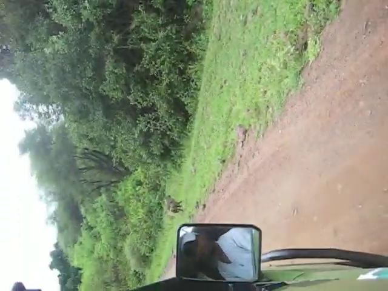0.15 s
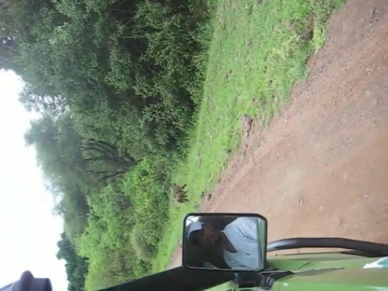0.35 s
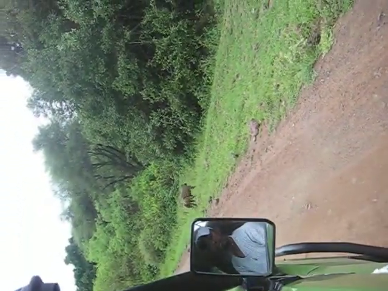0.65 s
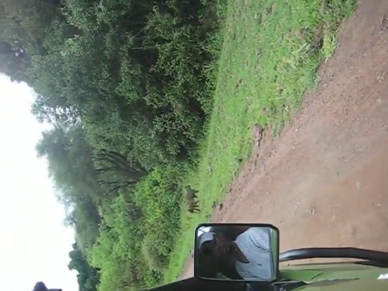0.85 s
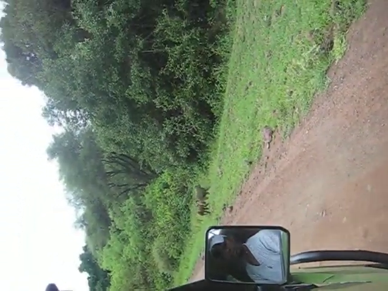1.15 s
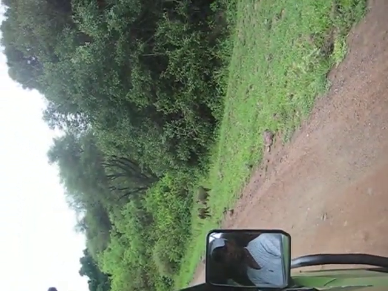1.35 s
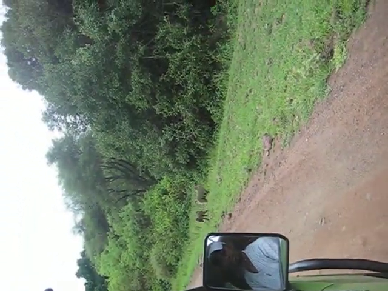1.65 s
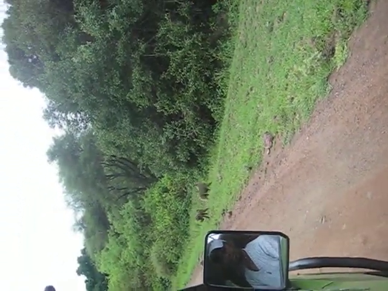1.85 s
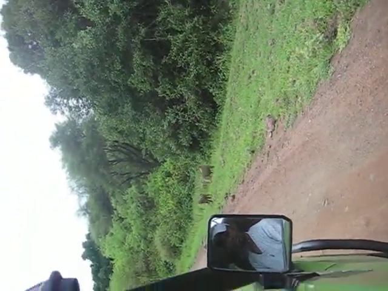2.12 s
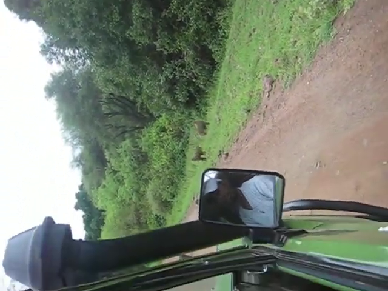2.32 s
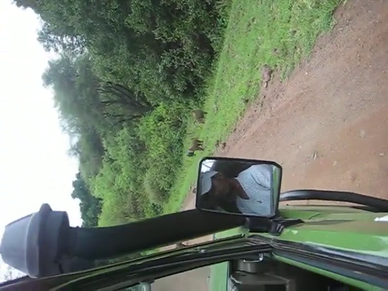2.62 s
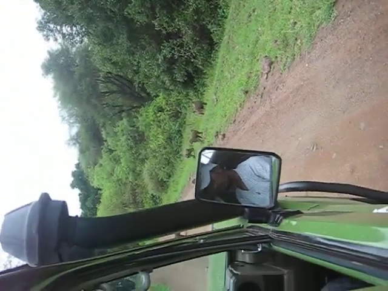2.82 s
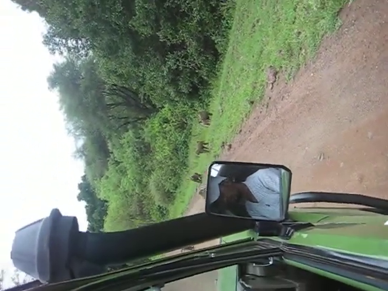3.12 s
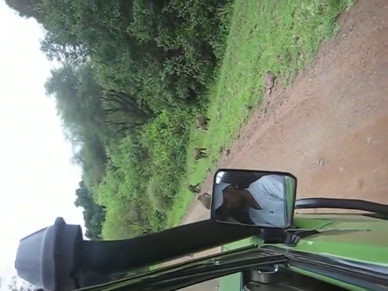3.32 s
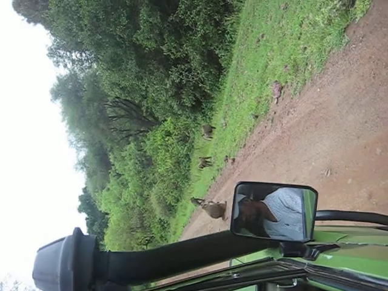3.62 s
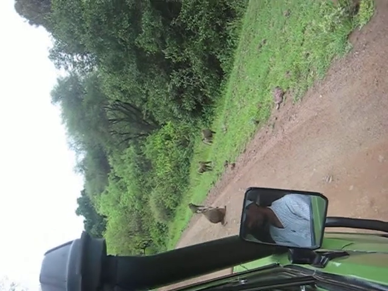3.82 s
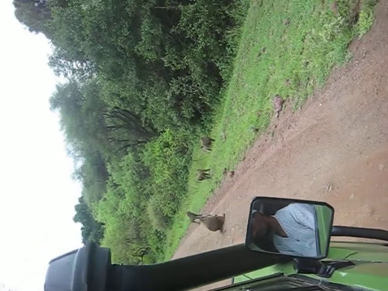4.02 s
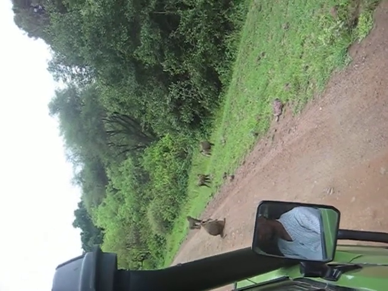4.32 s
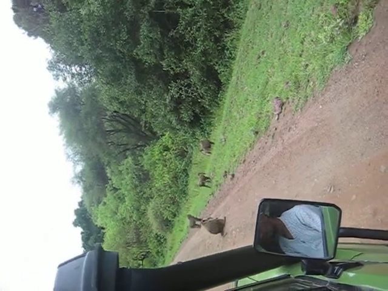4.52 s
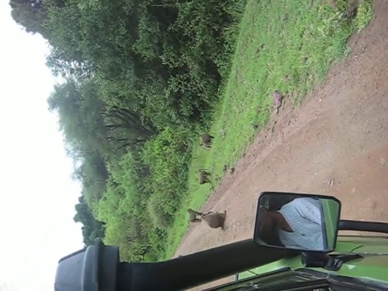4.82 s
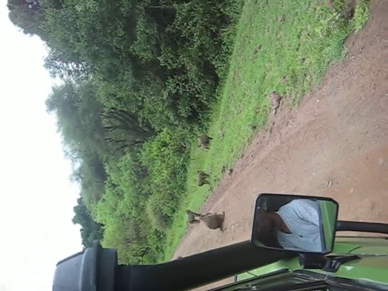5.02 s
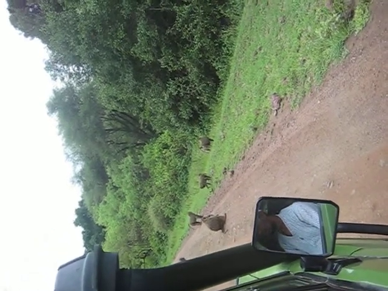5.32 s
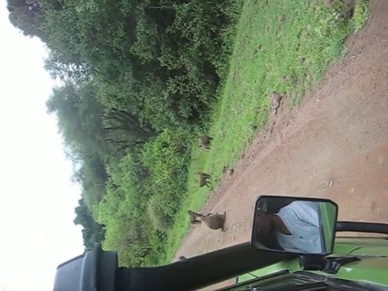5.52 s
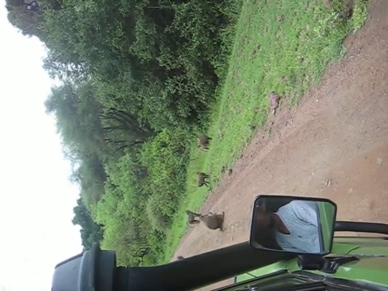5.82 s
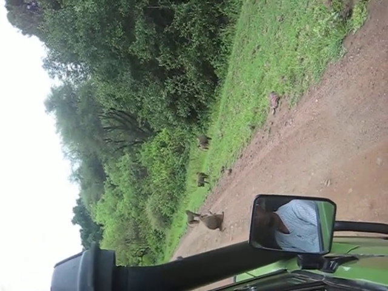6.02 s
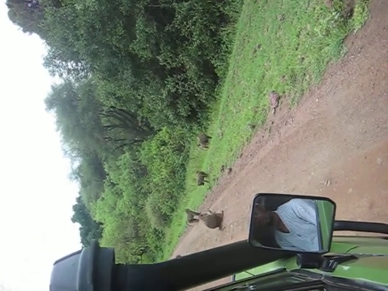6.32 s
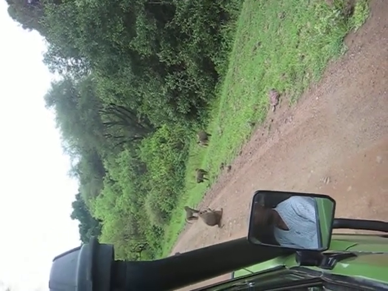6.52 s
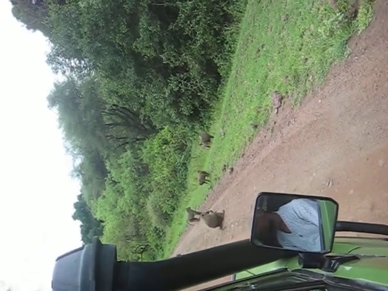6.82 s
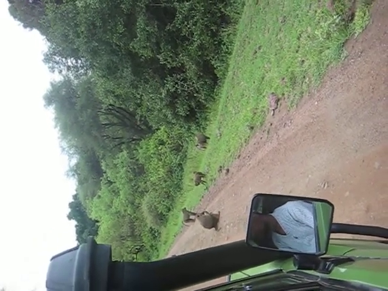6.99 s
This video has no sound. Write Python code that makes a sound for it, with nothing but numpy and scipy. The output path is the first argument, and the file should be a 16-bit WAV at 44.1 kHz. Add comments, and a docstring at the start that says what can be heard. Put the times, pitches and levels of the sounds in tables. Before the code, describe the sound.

Cicadas buzz high and steady in open bush as a baboon shrieks again and again, its voice raspy and cracking. A thinner, higher squeal from a youngster overlaps before the loudest screams and a short, low grunt near the microphone. The screaming breaks off, a small bird gives three quiet chirps, and the baboon adds a few brief, clearer cries. Two soft grunts end it. The trees give the calls a light echo.

```python
"""A baboon screams on a dirt track at the edge of thick bush, and a younger one squeals over it.
Their vocal folds vibrate irregularly, and the resonances of throat and mouth colour the tone.
Cicadas drone with clicking membranes over a broad hiss; low grunts sound close by and a small bird
chips. Trees and roadside scatter the calls, and an automatic gain control ducks under each loud scream."""
import sys
import numpy as np
from scipy import signal
from scipy.fft import rfft, irfft, next_fast_len
from scipy.io import wavfile
from scipy.ndimage import uniform_filter1d, minimum_filter1d, map_coordinates

SR = 44100
rng = np.random.default_rng(int(sys.argv[2]) if len(sys.argv) > 2 else 0)


def generate_wav(signal):
    """Clip the signal to [-1, 1] and save it as 16-bit WAV at the path in sys.argv[1]."""
    frames = np.transpose(np.atleast_2d(signal))
    scaled = np.clip(frames, -1, 1) * 32767
    pcm = np.round(scaled).astype(np.int16)
    wavfile.write(sys.argv[1], SR, pcm)


N = 315315


def amp(db):
    """Amplitude ratio of a level in decibels."""
    return 10 ** (np.asarray(db) / 20)


def unit(x):
    """Normalisation to an rms of 1."""
    return x / np.sqrt(np.mean(x ** 2) + 1e-20)


def steady(x, span_s=0.046):
    """Division by the running rms, which flattens the envelope."""
    width = round(span_s * SR)
    return x / np.sqrt(np.abs(uniform_filter1d(uniform_filter1d(x ** 2, width), width)) + 1e-12)


def along(points, hz):
    """Interpolation of (frequency_hz, value) points on a logarithmic frequency axis."""
    f, v = np.transpose(points)
    return np.interp(np.log(hz + 1), np.log(f + 1), v)


def wobble(rate_hz, size=N):
    """Low-pass noise: a spline through rate_hz random values a second."""
    knots = rng.standard_normal(int(size * rate_hz / SR) + 4)
    return map_coordinates(knots, [np.arange(size) * rate_hz / SR])


def filtered(x, response):
    """Linear filtering: the spectrum is multiplied by a frequency response."""
    m = next_fast_len(len(x) + 8192)
    return irfft(rfft(x, m) * response(np.fft.rfftfreq(m, 1 / SR)), m)[:len(x)]


def add(track, start_s, sound):
    """Superposition of a sound on a track."""
    part = track[round(start_s * SR):][:len(sound)]
    part += sound[:len(part)]


def contours(points, attack_s=0.016, release_s=0.0081, fade_db=28):
    """Onset and offset transients: the pitch climbs into a call and drops as the breath fades."""
    scoop_hz_per_s, sag_hz_per_s = 9070, 4200
    s, hz, db, rough = np.transpose(points)
    ends = [s[0] - attack_s, s[0], s[-1], s[-1] + release_s]
    t = np.arange(max(ends[0], 0), ends[-1], 1 / SR)
    bend = np.interp(t, ends, [scoop_hz_per_s * attack_s, 0, 0, sag_hz_per_s * release_s])
    breath = amp(np.interp(t, ends, [-fade_db, 0, 0, -fade_db]))
    return t, np.interp(t, s, hz) - bend, np.interp(t, s, db), np.interp(t, s, rough), breath


def cry(hz, rough, doubling, throat, flutter_hz, chaos_hz, harmonics):
    """Source and filter: vocal folds, modulated by flutter and chaos, excite the throat's resonances."""
    size, rough = len(hz), np.clip(rough, 0, 1)
    flutter = np.sin(2 * np.pi * np.cumsum(flutter_hz * (1 + .1 * wobble(25, size))) / SR)
    # the pitch wanders and cracks as the folds lose their rhythm
    cracks = .05 * wobble(70, size) + .05 * wobble(300, size) + .12 * flutter
    pitch = hz * (1 + 0.00303 * wobble(60.73, size) + rough * cracks)
    # period doubling: every second cycle weakens in spurts, adding lines between the harmonics
    order = np.arange(1, 2 * harmonics + 1)[:, None] / 2
    spurts = np.abs(doubling) * amp(7 * np.tanh(wobble(40, size)))
    weight = np.where(order % 1, spurts, 1) * (order * pitch < SR / 2.2)
    phase = 2 * np.pi * order * np.cumsum(pitch) / SR
    partials = weight * np.sin(phase) / np.maximum(order, 1) ** 0.66
    source = 0
    # chaos smears each line into a band centred above it, the overtones sooner and wider
    for rows, width_hz, power in (order[:, 0] <= 1, chaos_hz, 2), (order[:, 0] > 1, 2.5 * chaos_hz, 1.4):
        carriers = [(weight * wave(1.15 * phase))[rows].sum(0) for wave in (np.sin, np.cos)]
        smeared = sum(wobble(width_hz, size) * carrier for carrier in carriers)
        mix = .7 * rough ** power
        source = source + np.sqrt(1 - mix) * partials[rows].sum(0) + np.sqrt(mix / 2) * smeared
    throb = amp(rough * (9 * flutter + 3.5 * np.tanh(wobble(80, size))))
    return filtered(throb * source, lambda f: amp(along(throat, f)))


def screams(split_hz=2850, closing_db=16, fast_fall_hz_per_s=16000):
    """Nonlinear vibration of the vocal folds: rough, high calls that break at times to half pitch."""
    # screams: upper_resonances_db, points of (time_s, pitch_hz, level_db, roughness)
    calls = [ (-27.5, [(0, 2082, -17.5, 0.94), (.1, 2155, -24, 0.92), (.15, 2193, -31, 0.54),
             (.22, 2090, -29.5, 0.57)]), (-25.5, [(.245, 2147, -18.5, 0.28), (.285, 2242, -20, 0.67),
             (.33, 2156, -22, 0.8), (.368, 1991, -19.5, 0.47)]), (-30, [(.545, 1100, -27.5, 0.93),
             (.558, 1234, -22.5, .9), (.575, 1563, -18.5, 0.58), (.61, 1780, -13.5, .45),
             (.65, 1863, -13.5, 0.63), (.69, 1884, -13.5, 0.29), (.74, 1800, -29, 1),
             (.79, 1285, -35.5, 0.8), (.85, 1697, -38, 0.8)]), (-30, [(.865, 1580, -28, 0.98),
             (.89, 1546, -29.5, 0.84), (.92, 1487, -18, 0.45), (.96, 1558, -19.5, 0.58),
             (1.03, 1556, -19.5, 0.5), (1.085, 1438, -29, 0.52)]), (-28, [(1.325, 1121, -19.5, 0.2),
             (1.355, 1553, -11, 0.2), (1.38, 1708, -11, 0.52), (1.5, 1839, -11, .38),
             (1.63, 1962, -9.5, 0.38), (1.645, 1950, -16.5, 0.94), (1.67, 1759, -9, 0.26),
             (1.76, 1586, -24, 1), (1.785, 1707, -17.5, 0.68), (1.8, 1660, -20, 0.9)]),
             (-29.5, [(1.83, 1463, -31, 0.8), (1.87, 1413, -25, 0.4), (1.92, 1535, -13.5, 0.11),
             (1.96, 1633, -12, 0.18), (2, 1612, -13, 0.08), (2.038, 1674, -11, 0.24)]),
             (-23, [(2.235, 1250, -18.5, 0.48), (2.247, 1515, -10.5, 0.28), (2.265, 1658, -4.5, 0.05),
             (2.3, 1763, -9.5, 0.8), (2.5, 1789, -12.5, 0.54), (2.68, 1885, -18.5, 1.02),
             (2.85, 1863, -14, 0.54), (2.95, 1847, -18, 0.61), (3.04, 1900, -19, .5),
             (3.064, 1650, -18, .4)]), (-22.5, [(3.212, 1400, -15, 0.24), (3.232, 1695, 0.5, 0.22),
             (3.27, 1870, -5.5, 0.55), (3.315, 1800, -15, .5), (3.337, 1850, -9, .3),
             (3.38, 1817, -11, 0.48), (3.41, 1793, -27, 0.92), (3.435, 1733, -11.5, 0.45),
             (3.452, 1544, -13.5, 0.32)]), (-34.5, [(3.632, 1848, -17, 0.32), (3.642, 1960, -22.5, 0.24)]),
             (-25.5, [(3.654, 1496, -5, 0.24), (3.675, 1755, -12, 0.37), (3.72, 1835, -14, 0.68),
             (3.76, 2043, -16.5, 0.33), (3.82, 1981, -17.5, 0.19), (3.87, 1783, -14.5, 0.37),
             (3.915, 1600, -11, .3), (3.95, 1560, -13, .02), (3.972, 1480, -17, 0),
             (3.99, 1240, -29, 0.14)]), (-29, [(5.287, 1248, -18, 0.37), (5.32, 1405, -9.5, 0),
             (5.346, 1440, -9, 0.08), (5.353, 1541, -9, 0), (5.39, 1520, -11, 0.05),
             (5.425, 1420, -14.5, 0.01), (5.442, 1377, -14, 0.05), (5.458, 1373, -32, 0.53),
             (5.478, 1423, -31, 0.8)]), (-29, [(5.875, 1106, -25, 0.43), (5.887, 1150, -26, .4),
             (5.897, 1300, -20, 0), (5.906, 1380, -9, .05), (5.914, 1420, -8, .05)]),
             (-22, [(5.924, 1990, -16.5, 0.06), (5.955, 2088, -21.5, 0), (5.987, 1910, -14, .04),
             (6, 1622, -21.5, 0.2), (6.008, 1420, -19, 0.13)]), ]
    # response of the open throat and mouth: frequency_hz, gain_db
    throat = [(500, -22.5), (950, 6.5), (1300, 2.5), (1520, 10.5), (1900, 5.5), (2450, -1.5), (2850, -7),
              (3300, -5.5), (3900, -4.5), (4900, -10), (5600, -18), (7000, -20), (10000, -86), (15000, -42)]
    # spells of period doubling: middle_s, length_s, strength
    breaks = [(0.31, 0.081, 0.096), (0.684, 0.029, 0.067), (0.878, 0.076, .9), (0.975, 0.14, 0.35),
              (1.767, 0.067, 0.57), (2.233, .03, 0.36), (2.69, 0.18, 0.077), (2.959, 0.24, 0.11),
              (3.223, 0.045, 0.11), (3.412, 0.073, 0.21), (3.639, 0.025, 0.81), (3.711, 0.087, 0.098),
              (3.909, .05, 0.17), (5.286, .02, .15), (5.37, .07, .3), (5.88, 0.026, 0.14)]
    out = np.zeros(N)
    for upper_db, points in calls:
        t, hz, db, rough, breath = contours(points)
        doubling = sum(strength * np.clip(1 - np.abs(t - middle_s) * 2 / length_s, 0, 1)
                       for middle_s, length_s, strength in breaks)
        voice = cry(hz, rough, doubling, throat, flutter_hz=184.2, chaos_hz=1103.6, harmonics=8)
        low = filtered(voice, lambda f: 1 / (1 + (f / split_hz) ** 16))
        # the mouth closes and dulls the call where the pitch drops fast
        fall_hz_per_s = -uniform_filter1d(np.gradient(hz, t), size=300)
        closing = np.clip(fall_hz_per_s / fast_fall_hz_per_s, 0, 1) ** 2
        # the upper resonances swell less than the main one
        upper_gain = amp(upper_db + 0.38 * (db - db.mean()) - closing_db * closing)
        add(out, t[0], breath * (amp(db) * steady(low) + upper_gain * steady(voice - low)))
    return out


def cicadas(click_hz=358.5):
    """Resonance of many clicking membranes: narrow noise bands, amplitude-modulated at the click rate."""
    # bands of the chorus: centre_hz, width_hz, relative_db
    near_bands = [(7180, 44, -17), (7440, 96, -13), (7910, 51, -3), (8180, 48, 0), (8620, 27, -6),
                  (8870, 120, -6), (9360, 62, -3), (9610, 21, -5), (9740, 34, -5), (10400, 42, -12),
                  (11000, 120, -19), (11300, 59, -21), (11600, 42, -27), (11800, 74, -24), (12100, 79, -26),
                  (12600, 33, -30), (13100, 69, -33), (15100, 35, -31)]
    # bands of fainter, lower insects: centre_hz, width_hz, relative_db
    far_bands = [(3530, 450, -19), (5410, 380, -23)]
    # envelope of the chorus: time_s, level_db
    envelope = [(0, -32.5), (4.2, -32.5), (7.15, -33)]

    def resonances(f):
        """Power sum of the resonance peaks, each broadened by 40 Hz."""
        return np.sqrt(sum(amp(2 * db) / (1 + ((f - centre_hz) / (width_hz / 2 + 20)) ** 2) ** 1.015
                           for centre_hz, width_hz, db in near_bands + far_bands))

    t = np.arange(N) / SR
    clicks = 1 + .14 * np.sin(2 * np.pi * click_hz * t + .5 * wobble(3))
    level = amp(np.interp(t, *np.transpose(envelope)) + 0.35 * wobble(15))
    return level * unit(clicks * filtered(rng.standard_normal(N), resonances))


def hiss(level_db=-45):
    """Broadband noise of the far bush and the microphone, wavering slightly in level."""
    # spectral density: frequency_hz, relative_db
    spectrum = [(20, -5.5), (300, -2.5), (1700, -6.5), (2600, -8.5), (6800, -42), (9000, 1), (12000, -17.5),
                (15700, -46)]
    noise = filtered(rng.standard_normal(N), lambda f: amp(along(spectrum, f)))
    return amp(level_db + 0.65 * wobble(5.6)) * unit(noise)


def echoes(x, decay, rise_s):
    """Diffuse reverberation: convolution with noise in which each frequency decays at its own rate."""
    hz, t, spectra = signal.stft(rng.standard_normal(3 * SR // 2), SR, nperseg=256)
    tail = signal.istft(spectra * amp(-60 * t / along(decay, hz)[:, None]), SR, nperseg=256)[1]
    tail *= 1 - np.exp(-np.arange(len(tail)) / SR / rise_s)
    return signal.fftconvolve(x, tail / np.linalg.norm(tail))[:N]


def trees(x):
    """Multiple scattering among trees: a long tail in which low frequencies last longest."""
    # reverberation time: frequency_hz, t60_s
    decay = [(500, 3.1), (1500, 0.87), (4000, 1.25), (10000, 0.33)]
    return echoes(x, decay, rise_s=0.0043)


def roadside(x):
    """Scattering off the nearby bush: short paths give a quick tail."""
    # reverberation time: frequency_hz, t60_s
    decay = [(1000, 0.095), (5000, 0.32), (12000, 0.022)]
    return echoes(x, decay, rise_s=0.008)


def squeal():
    """Acoustic scaling: the younger animal's smaller folds and throat vibrate at higher frequencies."""
    # course of the squeal: time_s, pitch_hz, level_db, roughness
    points = [(1.74, 2947, -29, 1.12), (1.81, 3280, -22, 0.6), (1.84, 4263, -17, 0.34),
              (1.87, 3500, -30.5, 0.7), (1.905, 3495, -22.5, 0.28), (1.92, 3900, -26, 0.08),
              (1.96, 3813, -26, 0.4), (2.01, 4070, -24.5, 0.53), (2.05, 3954, -17.5, 0.52),
              (2.075, 3550, -17.5, 0.18), (2.1, 3773, -16.5, 0.04), (2.14, 3877, -14.5, 0.29),
              (2.19, 3600, -17.5, 0), (2.215, 3170, -18.5, 0), (2.27, 3260, -27, .05)]
    # response of the small throat: frequency_hz, gain_db
    throat = [(1500, -41.5), (2700, -3), (3300, -2), (4200, -5), (5600, -4.5), (7500, -6), (10000, -11.5),
              (12000, -14), (16000, -25)]
    out = np.zeros(N)
    t, hz, db, rough, breath = contours(points)
    voice = cry(hz, rough, 0, throat, flutter_hz=252, chaos_hz=2594, harmonics=4)
    add(out, t[0], breath * amp(db) * steady(voice))
    return out


def grunts():
    """Slow vibration of the vocal folds: a short harmonic series with an uneven amplitude."""
    # grunts close by: start_s, pitch_hz, length_s, level_db
    calls = [(2.95, 113.2, 0.068, -36), (6.44, 166.7, 0.055, -50.5), (6.85, 160.6, 0.063, -52)]
    out = np.zeros(N)
    for start_s, hz, length_s, db in calls:
        t = np.arange(0, length_s, 1 / SR)
        tone = sum(np.sin(2 * np.pi * k * hz * t + rng.uniform(0, 2 * np.pi)) / k ** 0.44
                   for k in range(1, 6))
        shimmer = 1 + .5 * wobble(170, len(t))
        add(out, start_s, amp(db) * np.sin(np.pi * t / length_s) * tone * shimmer)
    return out


def bird():
    """Frequency modulation: whistles swept in a few milliseconds are heard as chips, three to a phrase."""
    # phrases: start_s, level_db
    phrases = [(4.235, -34.5), (4.624, -37), (5.018, -37.5)]
    # chips of a phrase: delay_s, from_hz, to_hz, length_s, relative_db
    chips = [(0, 3006, 4100, 0.00762, 2), (.017, 5040, 2210, .014, 5), (0.064, 5140, 3000, .009, 1.5)]
    out = np.zeros(N)
    for start_s, phrase_db in phrases:
        for delay_s, from_hz, to_hz, length_s, db in chips:
            progress = np.arange(0, length_s, 1 / SR) / length_s
            sweep = np.sin(2 * np.pi * np.cumsum(from_hz + (to_hz - from_hz) * progress) / SR)
            add(out, start_s + delay_s, amp(phrase_db + db) * np.sin(np.pi * progress) * sweep)
    return out


def scene():
    """Superposition of the direct calls, their echoes and the background, in one channel."""
    baboons = screams() + squeal() + grunts()
    chips = bird()
    far_echoes = trees(amp(-18.5) * baboons + amp(-1) * chips)
    near_echoes = amp(-11) * roadside(baboons)
    return (baboons + chips + far_echoes + near_echoes + cicadas() + hiss())[None]


def record(dry, threshold_db=-18.5, top_hz=15720):
    """Compression: the gain falls a little after the level passes a threshold; a band limit follows."""
    lag, hold, window, smoothing = (round(s * SR) for s in (0.015, 0.015, 0.036, 0.0017))
    level_db = 10 * np.log10(np.abs(uniform_filter1d(dry[0] ** 2, window)) + 1e-10)
    delayed_db = np.pad(level_db, (lag + hold // 2, 0), "edge")
    held_db = -minimum_filter1d(-delayed_db, hold)[:N]  # running maximum
    cut_db = uniform_filter1d(0.92 * np.maximum(held_db - threshold_db, 0), smoothing)
    return filtered(dry[0] * amp(-cut_db), lambda hz: hz < top_hz)[None]


dry = scene()
out = record(dry)
generate_wav(out)
```